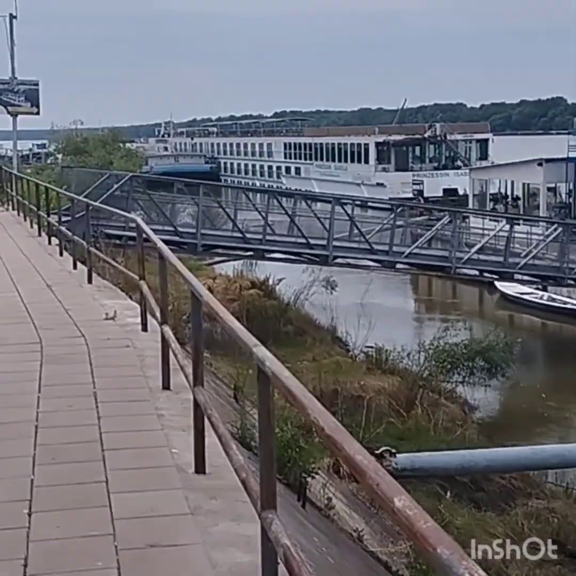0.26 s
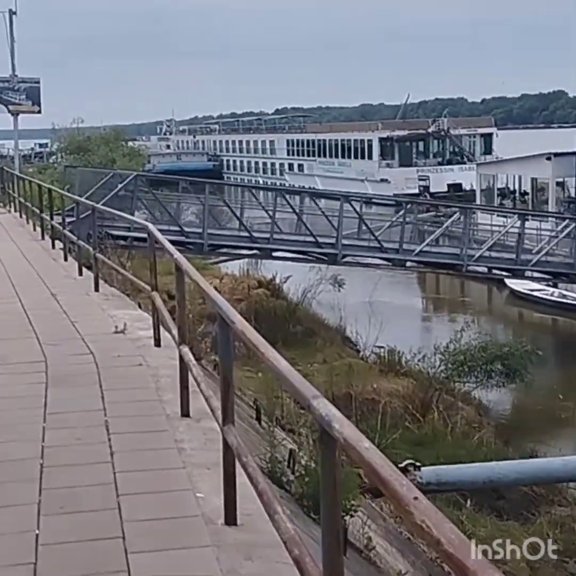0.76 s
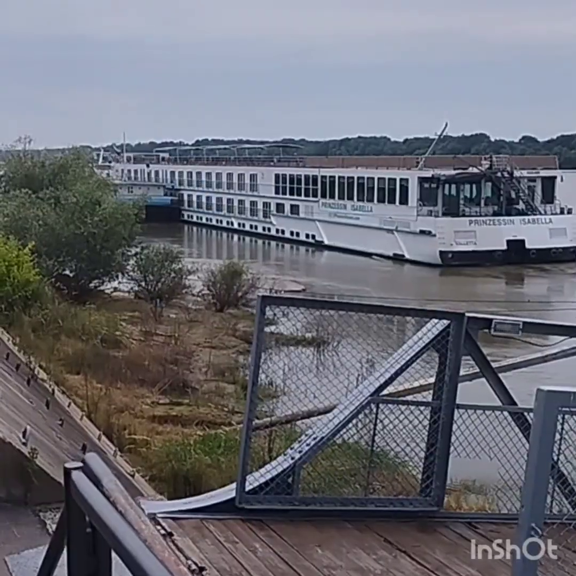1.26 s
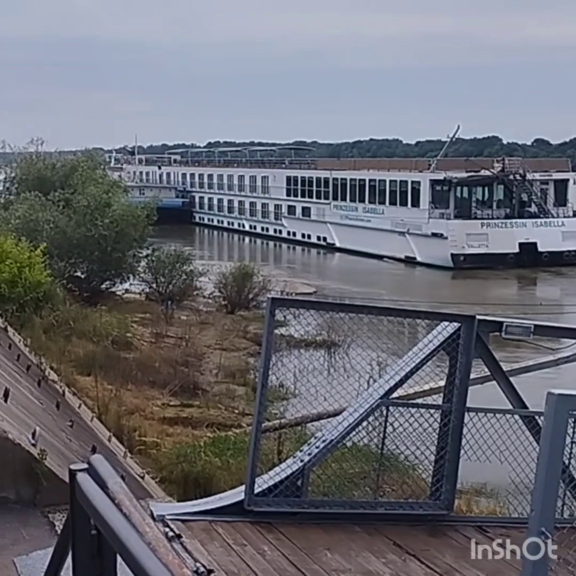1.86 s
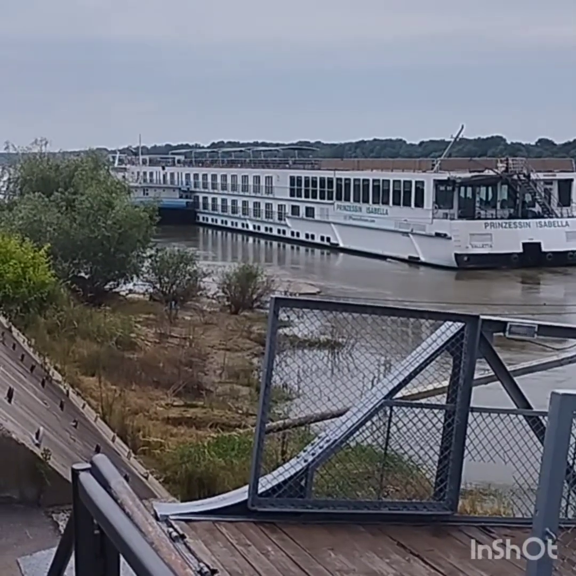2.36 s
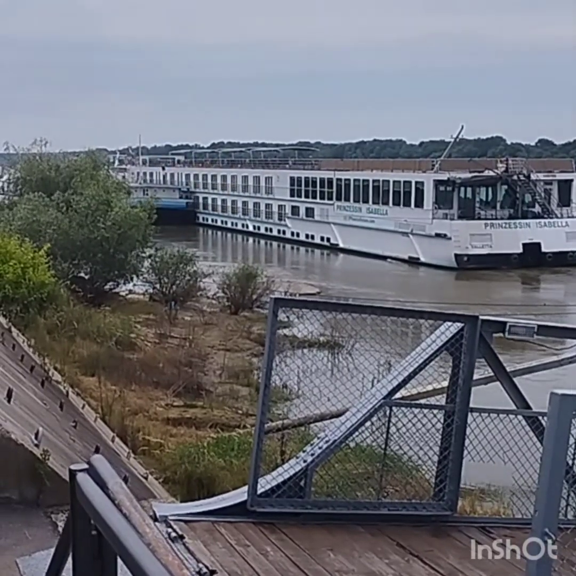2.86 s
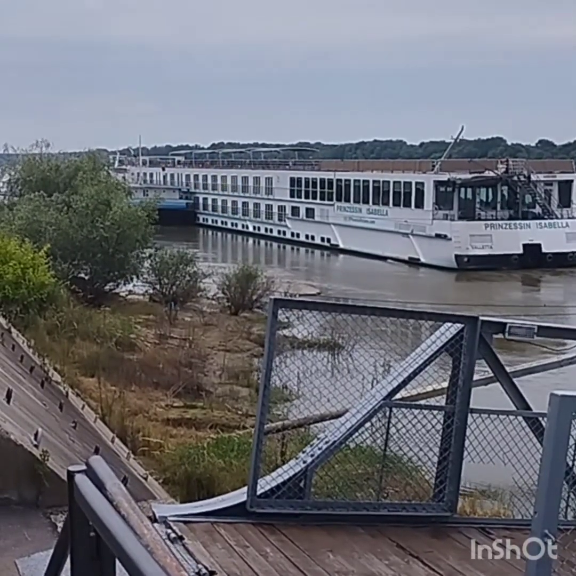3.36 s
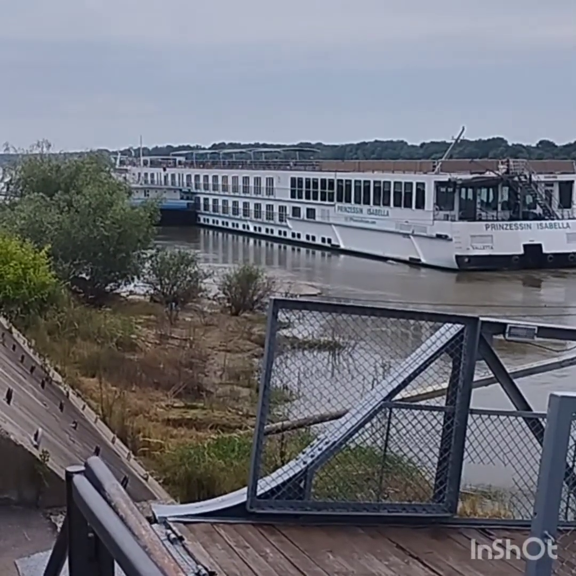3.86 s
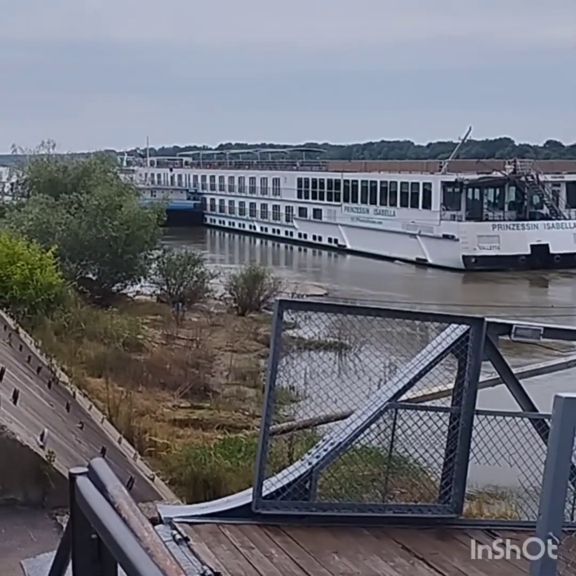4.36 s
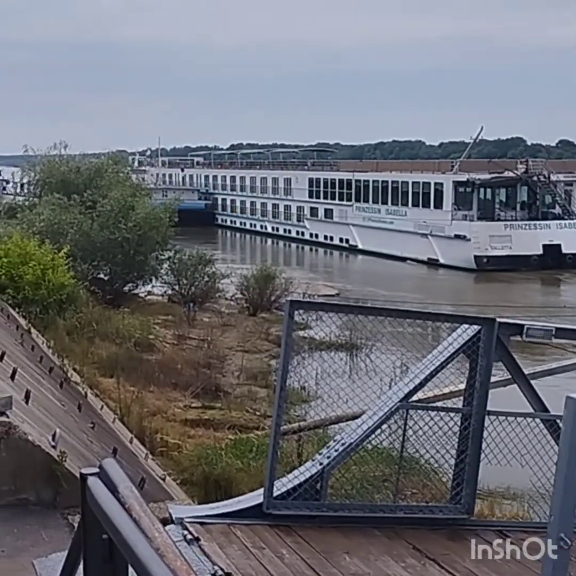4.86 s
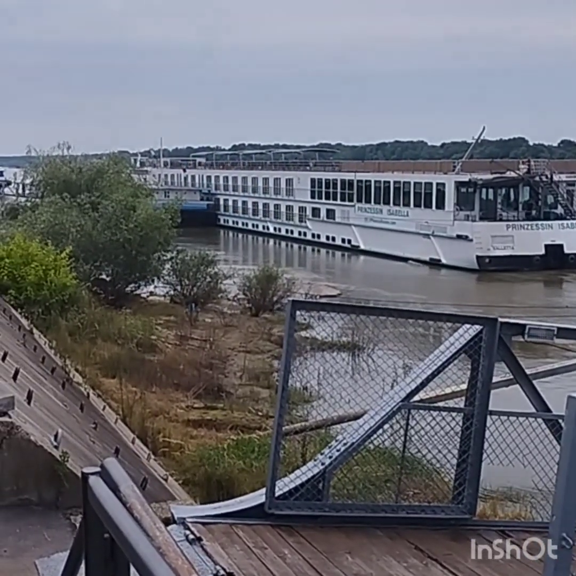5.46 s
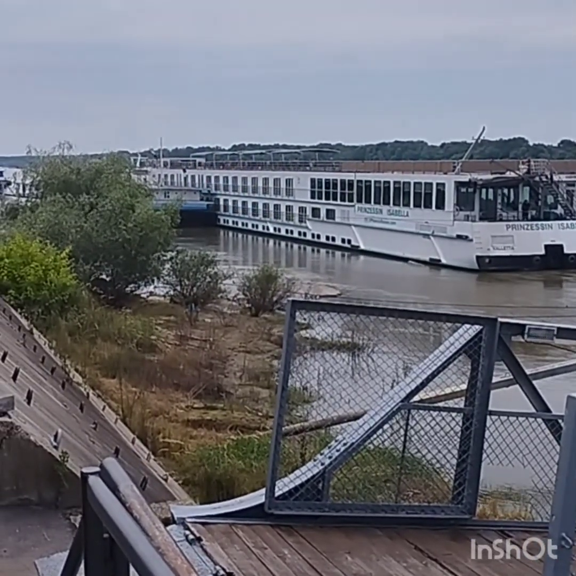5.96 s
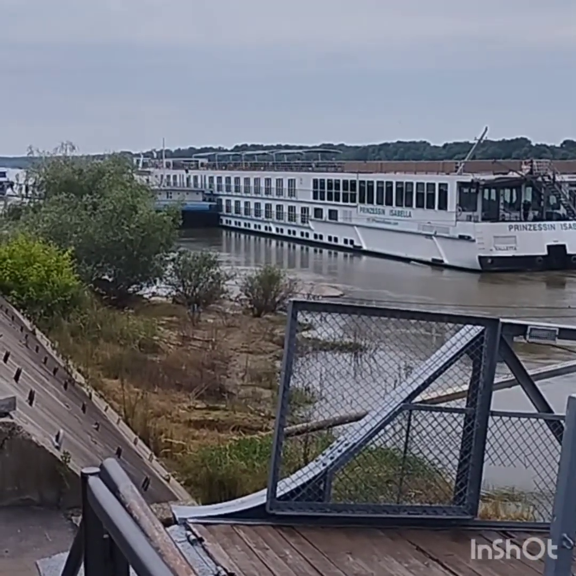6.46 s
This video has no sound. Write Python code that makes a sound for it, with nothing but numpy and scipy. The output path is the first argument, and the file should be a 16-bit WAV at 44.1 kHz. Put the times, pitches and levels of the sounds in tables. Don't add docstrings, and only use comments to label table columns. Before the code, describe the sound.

From 0 to 0.8 s, a moored ship's engines hum far across the water, mostly covered by strong wind that rumbles and puffs on the stereo microphone, hardest on the right at first, then jumping left around 0.6 s. Tiny dry clicks come from near the hand. At about 0.8 s everything chops off with a click, leaving silence until 0.95 s. Then a nearer, much louder engine drone fades in over roughly a fifth of a second, almost free of wind. It stays continuous: hollow, roaring exhaust, low hull throb, steady generator hum and thin fan hiss, wavering slightly. From 1.1 s wind returns in soft, irregular low puffs on either side. Around 4.1 s a stronger gust arrives with a short bright scrape near the microphone, rumbling until about 4.7 s. Lighter buffeting follows, with a sharp left thump near 6.5 s, before the drone stops abruptly at 6.7 s.

```python
import sys
import numpy as np
from scipy import signal
from scipy.fft import rfft, irfft
from scipy.io import wavfile
from scipy.ndimage import uniform_filter1d

SR = 44100
rng = np.random.default_rng(int(sys.argv[2]) if len(sys.argv) > 2 else 0)


def attenuation_scalar(level_db):
    decades = np.asarray(level_db, float) / 20
    return 10 ** decades


def generate_wav(sig):
    pcm = np.round(np.clip(np.atleast_2d(sig).T, -1, 1) * 32767).astype(np.int16)
    wavfile.write(sys.argv[1], SR, pcm)


N = 295558
CUT_S, RESUME_S = 0.79286, 0.9545


def in_time(rows):
    time_s, *columns = np.transpose(rows)
    return [np.interp(np.arange(N) / SR, time_s, column) for column in columns]


def by_stand(values):
    return np.where(np.arange(N) < CUT_S * SR, values[0], values[1])


def rms_one(x):
    return x / np.sqrt(np.mean(x ** 2) + 1e-20)


def drift(rate):
    r = np.exp(-80 * np.pi * rate / SR)
    coarse = rng.standard_normal(N // 40 + 2002)
    slow = signal.lfilter([1], [1, -2 * r, r * r], coarse)[2000:]
    return np.interp(np.arange(N) / 40, np.arange(len(slow)), rms_one(slow))


def band(x, low_hz, high_hz, order=2):
    return signal.sosfilt(signal.butter(order, [low_hz, high_hz], "band", fs=SR, output="sos"), x)


def ports(x, lag):
    left = np.interp(np.arange(N) - lag, np.arange(N), x)
    return np.array([left, x])


def coloured(spectrum, alike, lag):
    hz = np.maximum(np.fft.rfftfreq(N, 1 / SR), 1)
    points = np.array(spectrum)
    shape_db = np.interp(np.log(hz), np.log(points[:, 0]), points[:, 1], left=-90, right=-90)
    direct, *own = irfft(rfft(rng.standard_normal((3, N))) * attenuation_scalar(shape_db), N)
    alike = np.clip(alike, 0, 1)
    return rms_one(np.sqrt(alike) * ports(direct, lag) + np.sqrt(1 - alike) * np.array(own))


def resonances(modes, wander_db):
    out = np.zeros((2, N))
    for hz, width_hz, level_db, lag in modes:
        r = np.exp(-np.pi * width_hz / SR)
        poles = [1, -2 * r * np.cos(2 * np.pi * hz / SR), r * r]
        once = signal.lfilter([1], poles, rng.standard_normal(N + 8000))
        rung = signal.lfilter([1, 0, -1], poles, once)[8000:]
        out += ports(rms_one(rung) * attenuation_scalar(level_db + wander_db * drift(0.5)), lag)
    return out


def generator():
    # (multiple of 293.5 Hz, first stand [dB], second stand [dB], left lag [samples])
    tones = [
        (1, -45, -46, 4),
        (5, -84.5, -64, 4.5),
    ]
    turn = 2 * np.pi * 293.5 * np.cumsum(1 + 0.00087 * drift(0.8)) / SR
    out = np.zeros((2, N))
    for multiple, far_db, near_db, lag in tones:
        level_db = by_stand([far_db, near_db]) + 1.3 * drift(5.0)
        out += ports(np.sqrt(2) * np.sin(round(multiple) * turn) * attenuation_scalar(level_db), lag)
    return out


def engines():
    # (time [s], level [dB])
    air_load = [(.95, 1), (1.6, 0), (2.2, 1.5), (3.1, 1.5), (3.7, -1.5), (4.6, -1), (5.6, 1.5), (6.2, -1),
                (6.7, 0.2)]
    # (first stand [dB], second stand [dB], share of air swing [dB/dB], sag [dB/s])
    voices = [
        (-55.5, -40, .4, .2),
        (-54.5, -42.5, 0.56, 0.42),
        (-70.5, -49.5, 1.2, 0.14),
        (-69, -63, 1.6, 0.17),
    ]
    # (frequency [Hz], width [Hz], level [dB], left lag [samples])
    funnel_modes = [(507, 30, -7, 2), (536, 40, 0, 2), (580, 16, -4.5, 2), (603, 24, -6.5, 2),
                    (664, 30, -5, 2), (710, 60, -4, 2), (790, 50, -11, 4)]
    # (frequency [Hz], width [Hz], level [dB], left lag [samples])
    casing_modes = [(1129, 55, -12, 2.6), (1176, 44, -5.5, 4.4), (1213.2, 53, 0.5, 2.7),
                    (1260, 35, -7.5, 7.2), (1316, 25, -10, 2)]
    # (frequency [Hz], width [Hz], level [dB], left lag [samples])
    upper_modes = [(1618, 110, -1.5, 4.3), (1755, 240, 3.5, 3.6), (1921, 56, -1, 4.5),
                   (2200, 58, -7.5, 1.6), (2600, 150, -24, 21)]
    # (frequency [Hz], width [Hz], level [dB], left lag [samples])
    far_modes = [(479.6, 13, -60.5, 3.4), (706, 69, -61.5, 3), (792, 78, -58.5, 3.2), (996, 56, -66, 3.2),
                 (1610, 80, -63.5, 3), (2610, 1000, -73.5, 3.5)]
    # (frequency [Hz], width [Hz], level [dB], left lag [samples])
    hull_modes = [(50, 17, -38, 3), (125.4, 10.2, -43, 3), (352.5, 130, -54.5, 17), (974, 37, -64.5, 6.7),
                  (2640, 120, -80.5, 2.2)]
    # (frequency [Hz], density [dB per Hz])
    fan_spectrum = [(2400, -11), (2800, -13), (3300, 2), (4100, 3), (4800, -0.5), (5400, -6.5),
                    (7300, -18.5), (8400, -37.5)]
    # (frequency [Hz], density [dB per Hz])
    bed_spectrum = [(200, -10), (400, -4), (900, -3), (1400, -3.5), (2000, -5), (2800, -19.5),
                    (3500, -24.5)]

    air_db, = in_time(air_load)
    since_s = np.arange(N) / SR - RESUME_S
    levels_db = []
    for far_db, near_db, share, sag in voices:
        levels_db.append(by_stand([far_db, near_db + share * air_db - sag * since_s]))
    funnel_db, casing_db, upper_db, fan_db = levels_db
    bed_db = by_stand([-54, -47])

    out = attenuation_scalar(funnel_db - 0.5) * rms_one(resonances(funnel_modes, wander_db=0.55))
    out += attenuation_scalar(casing_db - 0.13) * rms_one(resonances(casing_modes, wander_db=-0.8))
    out += attenuation_scalar(upper_db - 2.0) * rms_one(resonances(upper_modes, wander_db=0.3))
    out += attenuation_scalar(fan_db + 0.24 + 0.61 * drift(14.0)) * coloured(fan_spectrum, alike=0.36, lag=3.1)
    out += attenuation_scalar(bed_db + 1.4 * drift(3.4)) * coloured(bed_spectrum, alike=0.6, lag=4.68)
    out += by_stand([1, 0]) * resonances(far_modes, wander_db=-0.5)
    out += resonances(hull_modes, wander_db=1.2)
    return out + generator()


def eddies(per_s, spread_db):
    kicks = np.zeros(N + SR)
    places, sizes, signs = rng.random((int(per_s * (N / SR + 1)), 3)).T
    size_db = spread_db * np.minimum(-np.log(1 - sizes), 4)
    kicks[(places * (N + SR)).astype(int)] = attenuation_scalar(size_db) * np.sign(signs - 0.5)
    return rms_one(kicks) + 0.25 * rng.standard_normal(N + SR)


def steady(x, seconds):
    return x / np.sqrt(uniform_filter1d(x ** 2, int(seconds * SR)) + 0.013 * np.mean(x ** 2))


def wind():
    # (time [s], left [dB], right [dB])
    gusts = [(0, -38, -25), (.1, -23, -18.5), (.38, -23, -27.5), (.5, -31.5, -26), (.72, -20.5, -25.5),
             (1.12, -33, -28.5), (1.5, -27, -30.5), (1.85, -32, -33), (2.3, -31.5, -32.5),
             (2.85, -29, -27.5), (3.4, -33.5, -33.5), (3.95, -31.5, -31.5), (4.15, -21, -24.5),
             (4.6, -24, -27), (4.85, -32, -29.5), (5.5, -29, -28.5), (6.3, -26, -27), (6.69, -29, -33)]
    # (low edge [Hz], high edge [Hz])
    rumble_bands = [
        (4, 75),
        (9, 85),
    ]
    flutter_levels_db = [-14.5, -9]
    calm_until_s, calm_ends_s, calm_db = 1.09, 0.015, -12

    calm = np.clip((calm_until_s - np.arange(N) / SR) / calm_ends_s + 1, 0, 1)
    lull_db = by_stand([0, calm_db]) * calm
    out = np.zeros((2, N))
    for port, (gust_db, flutter_db) in enumerate(zip(in_time(gusts), flutter_levels_db)):
        lumps = drift(12.0)
        rumble = band(band(eddies(110.0, 3.03), *rumble_bands[port]), 2.5, 230)[SR:]
        rumble = steady(rumble * attenuation_scalar(0.74 * lumps), 0.18)
        flutter = eddies(120.0, 5.0)[:N] * attenuation_scalar(1.5 * lumps)
        flutter = steady(band(band(flutter, 74, 200.0), 75, 270), 0.2)
        out[port] = attenuation_scalar(gust_db + lull_db - 0.1) * (rumble + attenuation_scalar(flutter_db) * flutter)
    return out


def microphone_hiss():
    # (frequency [Hz], density [dB per Hz])
    hiss_spectrum = [(6000, -12), (8000, -7), (9700, -4), (11000, -8), (12300, -1), (13600, 0), (15700, -2)]
    level_db = by_stand([-81, -82]) + 2.2 * drift(7.0)
    return attenuation_scalar(level_db) * coloured(hiss_spectrum, alike=0.084, lag=2.7)


def puffs():
    # (time [s], level [dB], width [s], brightness [dB])
    left_puffs = [(.043, -24.5, .12, 3.5), (.213, -20, 0.046, 10.5), (.389, -30.5, 0.026, 1),
                  (.596, -16, 0.037, 8), (.77, -28.5, 0.051, -7.5), (1.299, -34.5, 0.027, 11),
                  (1.447, -27.5, 0.03, -5), (2.1, -34.5, 0.042, -3), (2.234, -35, .044, -2),
                  (2.313, -26.5, 0.016, -4), (2.7, -36, 0.078, -8), (3.107, -26.5, 0.046, 11.5),
                  (3.482, -31.5, 0.022, 11), (4.042, -38, 0.015, 8), (4.327, -30.5, 0.062, -14),
                  (4.437, -35.5, 0.023, -2), (4.6, -34.5, 0.036, -11), (4.817, -37.5, 0.032, 1),
                  (4.968, -28, 0.03, 0), (5.15, -40, 0.038, 0), (5.357, -35, 0.021, -9),
                  (5.486, -33, 0.049, -10.5), (5.83, -34.5, 0.068, -4), (5.99, -40, .021, -4),
                  (6.126, -27, 0.026, -15), (6.182, -24.5, 0.019, -2), (6.28, -27, .025, 3),
                  (6.355, -28.5, 0.041, -9.5), (6.488, -17, 0.011, -4.5)]
    # (time [s], level [dB], width [s], brightness [dB])
    right_puffs = [(.129, -17, 0.015, 7), (0.167, -17.5, 0.031, 2), (.226, -14.5, 0.017, 0.5),
                   (0.283, -16, .019, -3), (.32, -15.5, 0.03, 5.5), (.483, -28, 0.04, -2),
                   (.585, -26.5, 0.018, 8), (.737, -28.5, 0.11, -6.5), (1.179, -31, 0.03, 2),
                   (1.522, -21.5, 0.012, 2), (1.747, -29.5, 0.027, -11), (2.542, -29.5, .023, -15),
                   (2.702, -32.5, .052, 8), (2.826, -21.5, 0.0092, -13), (2.952, -28, 0.061, 8),
                   (3.058, -23.5, 0.016, -10), (3.108, -25, 0.035, 13.5), (3.583, -28.5, .021, -1),
                   (3.724, -22.5, .021, -17), (4.146, -25.5, 0.046, 10), (4.297, -21.5, 0.073, 11),
                   (4.5, -22, 0.045, 3.5), (4.66, -24, .055, -3.5), (5.049, -28, 0.11, 0.5),
                   (5.374, -31, 0.031, -12), (5.487, -28.5, 0.056, 3), (5.88, -29.5, 0.089, 2),
                   (6.132, -25, 0.015, -8), (6.226, -26, 0.023, -5), (6.411, -24, 0.036, -2)]
    body_db, edge_db, push_levels_db = -1.5, -22, [4, 0.5]
    push_thins, push_lags, usual_puff_db = 0.38, 0.25, -31.5

    out = np.zeros((2, N + SR))
    t = np.arange(-SR // 4, SR // 4) / SR
    kicks = eddies(220.0, 3.6)
    layers = [band(band(kicks, *edges), *edges) for edges in ((94, 253), (298, 500), (53.4, 120))]
    stretches = (0.38, 0.33, 0.5)
    for port, table in enumerate((left_puffs, right_puffs)):
        for time_s, level_db, width_s, bright_db in table:
            push_db = push_levels_db[port] - push_thins * bright_db
            push_db -= push_lags * (level_db - usual_puff_db)
            at = round(time_s * SR) + SR // 4
            layer_db = (body_db, edge_db + bright_db, push_db)
            for noise, rel_db, stretch in zip(layers, layer_db, stretches):
                bell = np.exp(-0.5 * (t / (stretch * width_s)) ** 2)
                piece = noise[at + port * 4000:][:len(t)] * bell
                gain = np.sqrt(np.sum(bell ** 2) / np.sum(piece ** 2))
                out[port, at:at + len(t)] += piece * attenuation_scalar(level_db + rel_db) * gain
    return out[:, SR // 2:SR // 2 + N]


def rustles():
    starts_s = [.0705, .222, .673, 3.47, 4.116, 4.117, 4.118, 4.119]
    # (centre [Hz], width [Hz], level [dB], rise [s], t60 [s])
    bursts = [
        (5100, 3800, -43.5, 0.00027, 0.0055),
        (5300, 2500, -63, 0.047, 0.15),
        (5550, 5000, -53, .0004, 0.0062),
        (5670, 1100, -65, 0.008, .12),
        (9660, 9200, -71.5, .005, .07),
        (5470, 1100, -50.5, 0.0027, 0.15),
        (4230, 660, -48.5, 0.0027, 0.15),
        (2910, 460, -49, 0.008, 0.12),
    ]
    out = np.zeros(N)
    noise = rng.standard_normal((len(bursts), SR // 4))
    t = np.arange(SR // 4) / SR
    for start_s, row, (hz, width_hz, level_db, rise_s, t60_s) in zip(starts_s, noise, bursts):
        burst = rms_one(band(row, hz - width_hz / 2, hz + width_hz / 2))
        burst *= np.minimum(t / rise_s, 1)
        burst *= attenuation_scalar(-60 * np.maximum(t - rise_s, 0) / t60_s)
        out[round(start_s * SR):][:len(t)] += burst * attenuation_scalar(level_db)
    return ports(out, lag=1.7) * attenuation_scalar([[-0.6], [0.6]])


def scene():
    return engines() + wind() + puffs() + rustles()


def low_pass(x):
    return signal.sosfilt(signal.butter(12, 15750, fs=SR, output="sos"), x)


def record(dry):
    swell_s = 0.006
    start_pressure, cut_pressure = np.c_[[0.032, 0.046]], np.c_[[0.055, -0.164]]
    fade_s, fade_curve = 0.088, 0.8
    end_s, end_share = 0.0028, 0.75

    hiss = microphone_hiss()
    t = np.arange(N) / SR
    last = dry[:, [int(CUT_S * SR)]]
    dry = dry + (cut_pressure - last) * np.exp(-0.5 * ((t - CUT_S) / swell_s) ** 2)
    dry = dry + (start_pressure - dry[:, [0]]) * np.exp(-0.5 * (t / swell_s) ** 2)
    fade_in = (1 - np.exp(-np.maximum(t - RESUME_S, 0) / fade_s)) ** fade_curve
    edit = np.where(t < CUT_S, 1, fade_in)
    edit = edit * (1 - end_share * np.exp((t - N / SR) / end_s))
    return low_pass((dry + hiss) * edit)


dry = scene()
out = record(dry)
generate_wav(out)
```